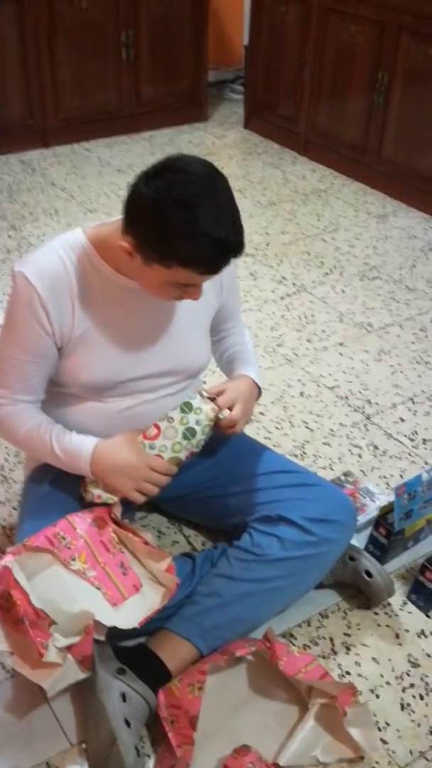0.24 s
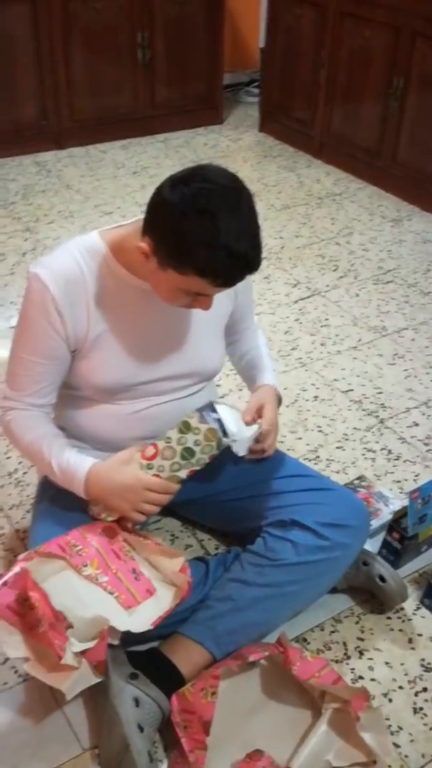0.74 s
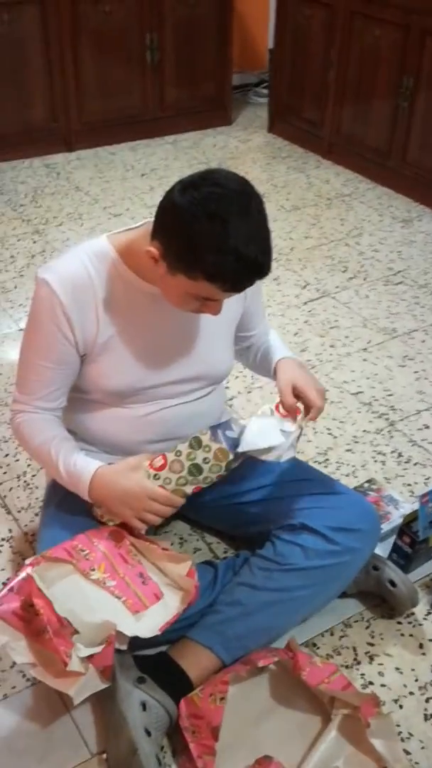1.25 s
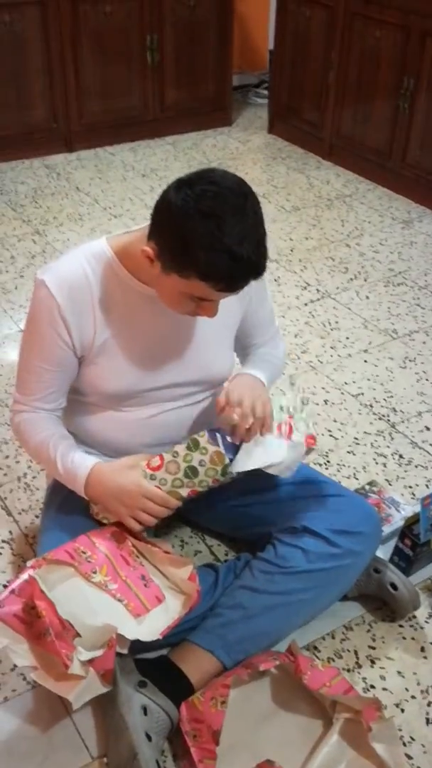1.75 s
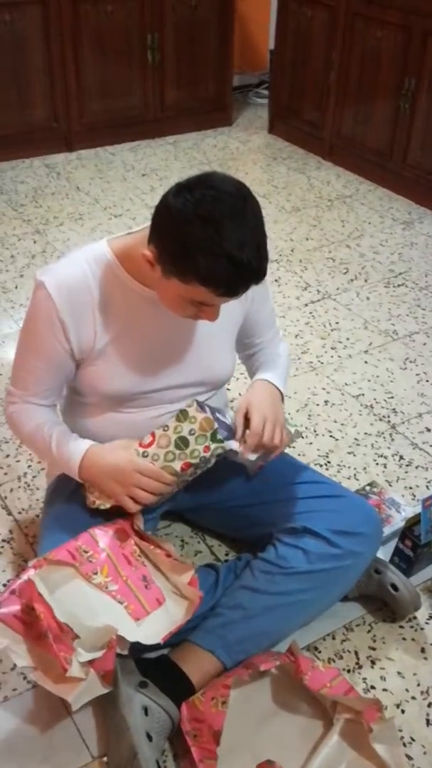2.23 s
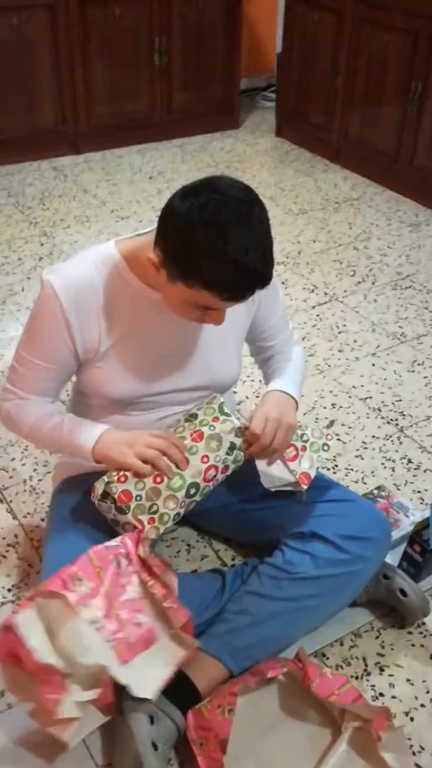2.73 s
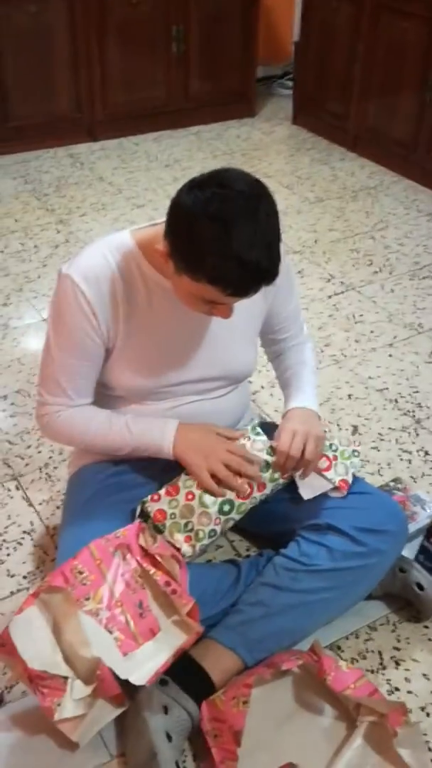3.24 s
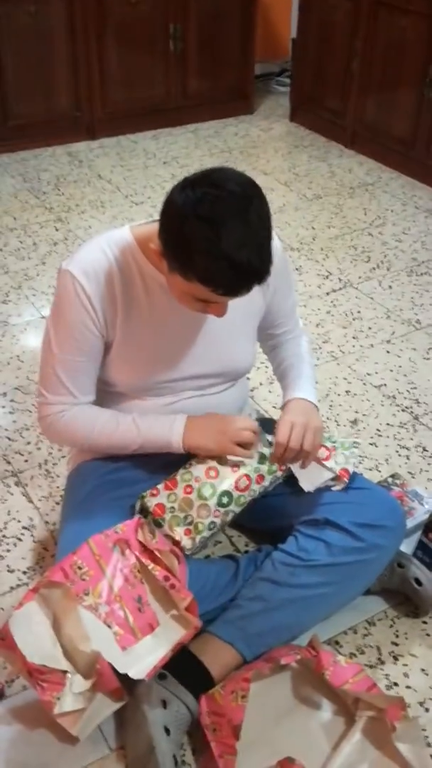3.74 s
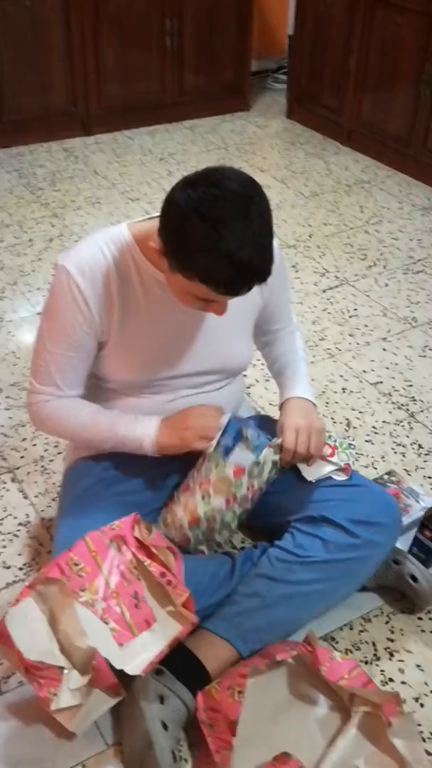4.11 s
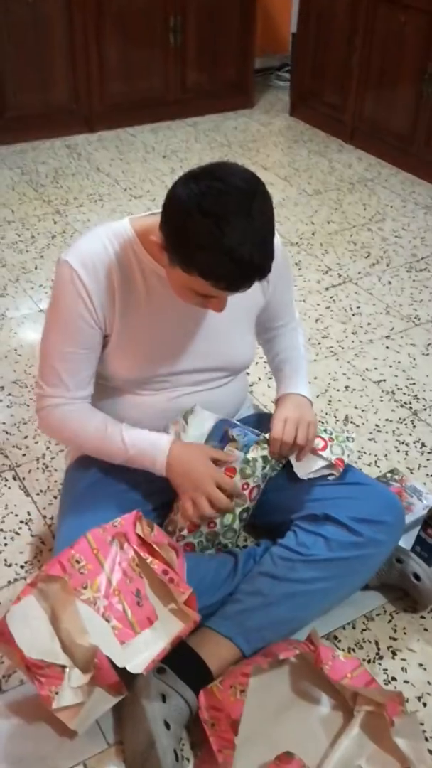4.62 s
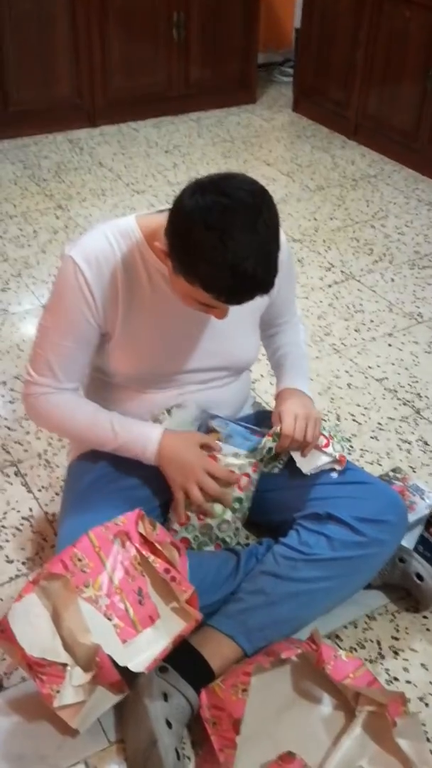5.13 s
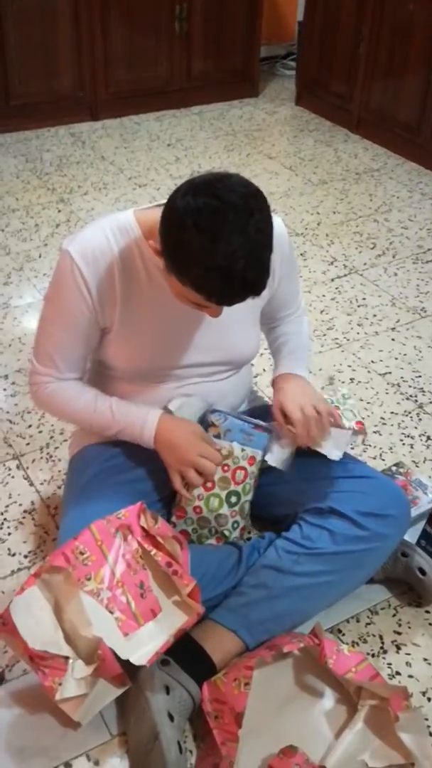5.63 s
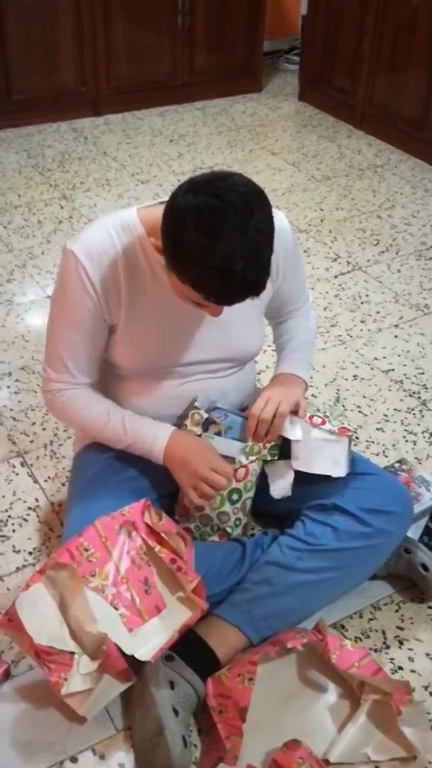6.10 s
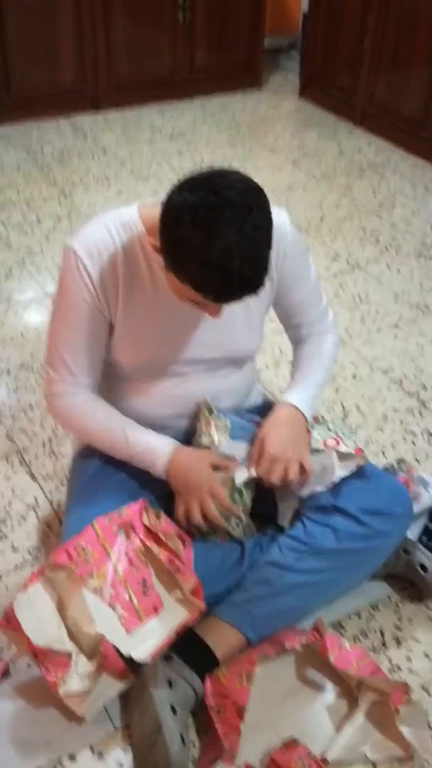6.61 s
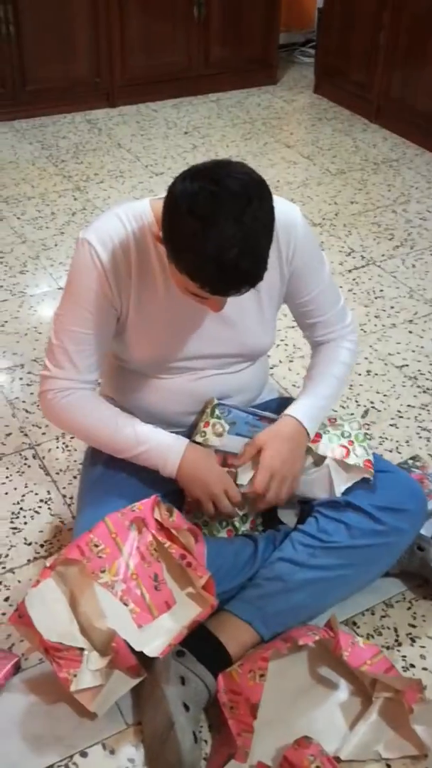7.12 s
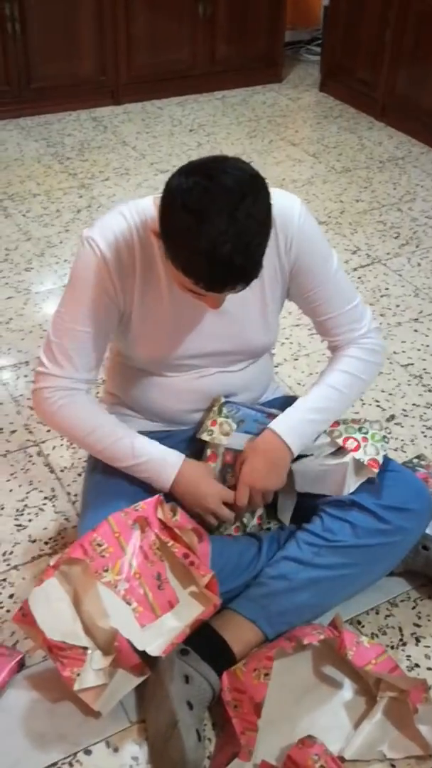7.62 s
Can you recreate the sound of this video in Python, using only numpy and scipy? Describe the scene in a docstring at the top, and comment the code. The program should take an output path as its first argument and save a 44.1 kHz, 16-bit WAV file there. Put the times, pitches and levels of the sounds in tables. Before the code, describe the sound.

Close in a hard tiled room, hands unwrap a small box. Crisp gift paper crackles and tears right away, with another firm rip about a second in, then lively crumpling. A softer fumbling pause follows, then two stronger rips, each with a dull hollow drone from the box. Lighter tears and small crackles finish it, over faint room air and hum.

```python
"""Gift paper is gripped, folded and ripped off a small box, strip by strip, in a hard tiled room.
Buckling creases and breaking fibres are streams of short ringing bursts, shaped by the force of the hands.
Single creases snap, slips scrape a stiff panel, and the pulled box drones in its low modes.
The room answers with decaying noise tails; still air and a faint mains hum lie underneath."""
import sys
import numpy as np
from scipy import signal
from scipy.fft import rfft, irfft, next_fast_len
from scipy.io import wavfile
from scipy.ndimage import uniform_filter1d, map_coordinates

SR = 44100
rng = np.random.default_rng(int(sys.argv[2]) if len(sys.argv) > 2 else 0)


def unload_audio(sound):
    """Save the sound as a 16-bit wav file, at the path given as the first command line argument."""
    columns = np.transpose(np.atleast_2d(sound))
    # keep every value between -1 and 1, then stretch to whole-number steps
    steps = np.round(np.clip(columns, -1, 1) * 32767)
    wavfile.write(sys.argv[1], SR, steps.astype(np.int16))


N = 346626  # samples

# Still air. Each row: frequency in Hz, relative level in dB per Hz.
AIR_SPECTRUM = [(20, 9.5), (60, -2.5), (150, 5), (300, -1), (700, 1.5), (2500, -1), (7000, -20.5),
                (16000, -42)]
# Mains hum. One row: frequency in Hz, RMS level in dB.
MAINS_HUM = (100, -81.5)
# Room decay. Each row: frequency in Hz, t60 in seconds.
ROOM_DECAY = [(200, 0.39), (600, 0.64), (1500, 0.45), (4000, 0.47), (9000, 0.32), (15000, 0.27)]
# Diffuse field. Each row: frequency in Hz, left-right correlation (-1 to 1).
FIELD_LIKENESS = [(100, 0.96), (290, 0.88), (640, -0.61), (1400, 0.33), (3000, 0.071), (14000, -0.2)]
# Channel colour. Each row: frequency in Hz, left minus right in dB.
CHANNEL_BALANCE = [(350, 0.3), (700, 0), (1250, -4), (2400, -1), (4600, -2.5), (7500, -4), (10000, 0.5),
                   (15000, 3)]
# Low modes of the box. Each row: frequency in Hz, width in Hz, relative level in dB.
BOX_MODES = [(143, 41, -16.5), (266, 61, -1), (327, 84, 0)]
# Paper and fingers slipping over the box. Each row: start in seconds, length in seconds, pitch in Hz,
# level in dB.
SCRAPES = [(0.788, 0.028, 2270, -45), (1.578, 0.049, 940, -63.5), (2.36, 0.12, 3800, -53),
           (2.795, 0.14, 1720, -59), (3.035, 0.1, 1510, -60.5), (3.285, 0.18, 2200, -57),
           (3.481, 0.13, 1560, -55), (3.639, 0.057, 1880, -39), (5.611, 0.053, 6200, -44),
           (5.839, 0.1, 4950, -45.5), (6.198, 0.28, 3270, -61.5), (6.619, 0.33, 3460, -56.5),
           (6.931, 0.47, 3400, -66.5), (7.227, 0.061, 3800, -46), (7.75, 0.031, 2130, -44.5),
           (7.834, 0.059, 2600, -47)]
# Loud creases that buckle. Each row: time in seconds, relative level in dB, pitch in Hz.
SNAPS = [(0.064, -41, 5770), (0.1393, -40, 5270), (0.2476, -32.5, 3380), (0.6136, -42.5, 6700),
         (0.8005, -37, 2200), (0.8805, -33, 8800), (1.1735, -37, 2500), (1.2028, -33, 6060),
         (1.2178, -29.5, 2900), (1.365, -38.5, 6200), (1.6778, -38, 2520), (1.8414, -39, 2800),
         (1.94, -36, 5900), (2.2178, -45.5, 3030), (2.2713, -38, 7340), (2.3773, -42, 4070),
         (2.4369, -31.5, 5760), (2.552, -35.5, 7100), (2.6299, -33.5, 5630), (2.723, -39.5, 7650),
         (2.795, -40.5, 1780), (2.9088, -42.5, 2580), (3.044, -48.5, 2100), (3.2196, -51, 1900),
         (3.2677, -42, 1830), (3.3012, -43.5, 2180), (3.338, -42, 2300), (3.3958, -53, 2200),
         (3.432, -50, 2270), (3.4836, -43, 1570), (3.5577, -45, 1600), (3.6122, -30, 6050),
         (3.6161, -30, 6600), (3.6595, -31.5, 5500), (3.7539, -34.5, 5170), (3.804, -28.5, 5960),
         (3.8074, -27.5, 5400), (3.9134, -32.5, 3650), (4.4599, -37.5, 8300), (4.5456, -36.5, 3300),
         (4.8242, -50, 6000), (4.851, -44, 6230), (4.8975, -35, 3600), (4.9238, -29, 5240),
         (5.3166, -41, 5100), (5.345, -46, 4300), (5.8459, -46, 5500), (6.521, -41.5, 7000),
         (6.7608, -39, 5640), (6.8078, -37, 6000), (7.0602, -51, 6100), (7.221, -39, 4100),
         (7.2439, -36.5, 6400), (7.3605, -38, 5900), (7.4548, -44.5, 5500), (7.694, -44.5, 2600),
         (7.739, -40, 2500), (7.752, -35, 2400), (7.771, -52, 2500), (7.8591, -34, 2900)]
# Colour of crackling paper. Each row: frequency in Hz, relative level in dB per Hz.
PAPER_SPECTRUM = [(76, -31), (130, -37), (211, -8), (248, -8.5), (297, -6.5), (472, -9), (565, -5),
                  (638, 0), (917, -3), (1460, -1.5), (4680, -2.5), (5620, 0), (9670, -10.5), (14200, -13),
                  (16000, -14)]
# Hands grip, fold or crumple the paper. Each row: start in seconds, length in seconds, relative paper
# level in dB, swell over the length in dB, brightness in dB per octave, relative box level in dB.
STROKES = [(0.0, 0.084, -41, -9, 3, -65), (.12, 0.14, -42, 6, 1.5, -65), (.25, 0.11, -39, -2, 1, -59),
           (.72, 0.15, -45.5, 3.5, -1.5, -76), (.89, .075, -42, 4, 1, -64),
           (1.215, 0.031, -35.5, -5.5, -1.2, -56.5), (1.28, 0.13, -45, 0, 0.5, -70),
           (1.585, 0.038, -58, 18, -1, -61.5), (1.68, 0.23, -45, -6.5, 1.2, -71),
           (1.94, 0.12, -42, -0.5, -0.9, -69), (2.1, .22, -49, 1, 0.5, -68),
           (2.43, 0.08, -43, -11.5, 1.4, -79), (2.55, 0.16, -40, -7.5, -.5, -69),
           (2.81, 0.11, -49, 2.5, -0.5, -77), (3.045, .15, -58.5, -3, -3.3, -73.5),
           (3.26, 0.13, -49.5, -9, -1, -77), (3.4, .2, -62, 0, -3, -80), (3.616, 0.088, -35, 2, 1.2, -77),
           (3.74, .06, -42.5, -1, 0, -64), (4.45, 0.06, -51, 10.5, -2, -62.5),
           (4.555, 0.059, -42, -1.5, -.3, -63), (4.753, 0.025, -68, -5, 3, -55),
           (4.853, 0.034, -43, 10, 2, -72), (4.9, .035, -35.5, -9, -0.5, -64),
           (5.34, 0.091, -45, -8, -2, -73), (5.62, 0.053, -43.5, 1.5, 2.5, -60.5),
           (5.86, 0.034, -46, 3, 5, -62), (6.11, 0.091, -46, -8, -1, -74),
           (6.23, 0.042, -42.5, -3, 2.5, -55.5), (6.3, 0.075, -49.5, 3.5, -1.5, -72),
           (6.45, 0.041, -54, 1, -2, -81), (6.525, 0.034, -47.5, -19.5, -0.9, -74),
           (6.632, 0.015, -37.5, 0, 1.1, -61), (6.67, 0.078, -46.5, 4, .3, -58.5),
           (6.76, 0.074, -44, -1, 0.4, -53), (6.89, 0.04, -50.5, -4, -0.5, -57),
           (7.06, 0.028, -56.5, -11, -3, -71), (7.195, .045, -52.5, -4, 2, -57.5),
           (7.44, 0.12, -51, 4, -1, -66.5), (7.56, .14, -47.5, 5, 1, -63), (7.75, 0.12, -45, 2, -1, -83)]
# Strips ripped off. Each row: start in seconds, length in seconds, relative paper level in dB,
# swell over the length in dB, brightness in dB per octave, relative box level in dB.
RIPS = [(.35, 0.088, -33, 1.5, 0.5, -58), (.97, .13, -34.5, 1.5, 0, -57), (3.807, 0.17, -33.5, 2.5, 1, -53),
        (4.95, .26, -35.5, -6.5, 0.5, -52), (5.91, 0.11, -38.5, 0.5, 2, -54.5),
        (7.243, 0.11, -40.5, -1, 2, -51)]

TOP_HZ = 15950
ATTACK_DB_PER_S = 748  # the paper takes up the load almost at once
STROKE_RELEASE_DB_PER_S, RIP_RELEASE_DB_PER_S = 225, 185  # a torn strip rustles a little longer
BOX_ATTACK_DB_PER_S, BOX_RELEASE_DB_PER_S = 498, 206  # the box takes up the pull more softly
RESTING_DB = -73.5  # paper merely held still creaks faintly
JERK_DB, JERKS_PER_S = 1.5, 35  # the hands move unevenly


def amp(db):
    """Amplitude of a level in dB."""
    return 10 ** (np.asarray(db) / 20)


def unit(x):
    """x scaled to an RMS of 1."""
    return x / np.sqrt(np.mean(x ** 2) + 1e-20)


def along(points, hz):
    """Interpolate (Hz, value) points on a log frequency axis."""
    f, v = np.transpose(points)
    return np.interp(np.log(hz + 1), np.log(f + 1), v)


def filtered(x, response):
    """Apply a complex response of frequency."""
    size = x.shape[-1]
    padded = next_fast_len(size + SR // 4)
    spectrum = rfft(x, padded) * response(np.fft.rfftfreq(padded, 1 / SR))
    return irfft(spectrum, padded)[..., :size]


def coloured(x, points):
    """Minimum-phase filter with the gain of (Hz, dB) points, so that clicks keep their edge."""
    size = 4096
    gain_db = np.maximum(along(points, np.fft.rfftfreq(size, 1 / SR)), -70)
    cepstrum = irfft(np.log(amp(gain_db)))
    cepstrum[1:size // 2] *= 2
    cepstrum[size // 2 + 1:] = 0
    impulse = irfft(np.exp(rfft(cepstrum)))
    return signal.fftconvolve(x, impulse[None], axes=1)[:, :N]


def resonance(f, hz, width_hz):
    """Band-pass response of one damped mode, 1 at its peak."""
    return 1j * f * width_hz / (hz * hz - f * f + 1j * f * width_hz)


def wobble(knots_per_s):
    """Smooth random curve: a spline through random knots."""
    knots = rng.standard_normal(int(N * knots_per_s / SR) + 4)
    return map_coordinates(knots, [np.arange(N) * knots_per_s / SR])


def diffuse(pair):
    """Mix two unrelated signals into a stereo field with the tabled left-right correlation."""
    def mid_side_gains(f):
        angle = np.arccos(np.clip(along(FIELD_LIKENESS, f), -1, 1)) / 2
        return np.array([np.cos(angle), np.sin(angle)])

    mid, side = filtered(pair, mid_side_gains)
    return np.array([mid + side, mid - side])


def background():
    """Still air as diffuse coloured noise, mains hum as a steady sine."""
    noise = diffuse(rng.standard_normal((2, N)))
    air = unit(filtered(noise, lambda f: amp(along(AIR_SPECTRUM, f))))
    hz, db = MAINS_HUM
    hum = amp(db) * np.sqrt(2) * np.sin(2 * np.pi * hz * np.arange(N) / SR)
    return amp(-69.5) * air + hum


def room(x, wet_db, folds=6):
    """Hard surfaces answer: every 5 ms the sound leaves a random fold, each with its own noise tail."""
    step = SR // 200
    fold = np.repeat(rng.integers(folds, size=N // step + 1), step)[:N]
    wet = np.zeros((2, N))
    for k in range(folds):
        hz, t, z = signal.stft(rng.standard_normal((2, 2 * SR // 3)), SR, nperseg=256)
        # floor and body are close: the first echoes are the strongest
        early = 1 + .8 * np.exp(-t / .008)
        decay = amp(-60 * t / along(ROOM_DECAY, hz)[:, None])
        tail = signal.istft(z * early * decay, SR, nperseg=256)[1]
        tail[:, :SR // 400] = 0
        tail /= np.sqrt(np.sum(tail ** 2) / 2)
        turn = np.sin(np.pi / 2 * uniform_filter1d(1. * (fold == k), step))
        wet += signal.fftconvolve(x * turn, tail, axes=1)[:, :N]
    return amp(wet_db) * diffuse(wet)


def box(pull):
    """Random slips of the dragged paper shake the hollow box in its low modes."""
    def modes(f):
        # neighbouring modes alternate in sign
        return sum((-1) ** k * amp(db) * resonance(f, hz, width_hz)
                   for k, (hz, width_hz, db) in enumerate(BOX_MODES))

    slips = rng.standard_normal(N) * (rng.random(N) < 700 / SR)  # about 700 per s
    drone = coloured(filtered(slips, modes)[None],
                     [(60, -31.5), (140, -2.5), (380, -1), (520, -3.0), (1500, -46.5)])
    return pull * unit(drone) * np.ones((2, 1))


def scrapes():
    """Tiny random slips excite one stiff panel of the wrapping."""
    out = np.zeros((2, N + SR))
    for start_s, length_s, hz, db in SCRAPES:
        size = int(length_s * SR)
        slips = rng.standard_normal(size) * (rng.random(size) < 500 / SR)  # about 500 per s
        panel = unit(filtered(slips, lambda f: resonance(f, hz, 0.31 * hz) ** 2))
        scrape = amp(db) * panel * signal.windows.tukey(size, .5)
        out[:, int(start_s * SR):][:, :size] += scrape
    return out[:, :N]


def pops(times_s, sizes, hz, life_s, ring, sharpness, spread):
    """Very short noise bursts, each ringing its own facet of paper, uneven between the channels."""
    size = 256
    t, f = np.arange(size) / SR, np.fft.rfftfreq(2 * size, 1 / SR)
    common, apart = rng.standard_normal((len(times_s), 2, size)).transpose(1, 0, 2)
    burst = np.array([common + spread * apart, common - spread * apart])
    burst *= np.sqrt(t) * np.exp(-t / life_s)
    facet = 1 + ring * resonance(f, hz[:, None], hz[:, None] / sharpness)
    waves = irfft(rfft(burst, 2 * size) * facet)
    waves *= sizes[:, None] / np.sqrt(np.mean(np.sum(waves ** 2, -1), 0))[:, None]
    at = (times_s * SR).astype(int)[:, None] + np.arange(2 * size)
    return np.array([np.bincount(at.ravel(), w.ravel(), N)[:N] for w in waves])


def snaps():
    """Single creases flip over within a millisecond or two; low-pitched facets ring the most."""
    times_s, db, hz = np.transpose(SNAPS)
    ring = np.clip(9000 / hz[:, None], 1, 5)
    x = pops(times_s, amp(db + 23.5), hz, life_s=.0007, ring=ring, sharpness=3.2, spread=.5)
    return coloured(x, [(150, -18), (700, -7), (1600, 3.5), (6500, 2.5), (10000, -4.5), (16000, -9.5)])


def envelope(t, start_s, length_s, swell_db, attack_db_per_s, release_db_per_s):
    """Gain of one movement: a rise up to its start, a hold that swells or sags, a release."""
    held = np.clip((t - start_s) / length_s, 0, 1)
    before = attack_db_per_s * np.maximum(start_s - t, 0)
    after = release_db_per_s * np.maximum(t - start_s - length_s, 0)
    return amp(np.maximum(swell_db * (held - .5) - before - after, -120))


def hands():
    """Movements add up to the paper force, its brightness, the share of ripping and the box pull."""
    t = np.arange(0, N, 64) / SR
    moves = np.transpose(list(STROKES) + list(RIPS))[:, :, None]
    start_s, length_s, db, swell_db, tilt, box_db = moves
    is_rip = (np.arange(len(start_s)) >= len(STROKES))[:, None]
    release = np.where(is_rip, RIP_RELEASE_DB_PER_S, STROKE_RELEASE_DB_PER_S)
    power = (amp(db) * envelope(t, start_s, length_s, swell_db, ATTACK_DB_PER_S, release)) ** 2
    pulls = amp(box_db) * envelope(t, start_s, length_s, 0, BOX_ATTACK_DB_PER_S, BOX_RELEASE_DB_PER_S)
    total = power.sum(0) + amp(RESTING_DB) ** 2
    force = np.sqrt(total)
    brightness = (power * tilt).sum(0) / total
    ripping = (power * is_rip).sum(0) / total
    pull = np.linalg.norm(pulls, axis=0)
    return [np.interp(np.arange(N) / SR, t, c) for c in (force, brightness, ripping, pull)]


def crackle(pops_per_s, scatter_db, centre_hz, life_s, ring):
    """Stream of random pops, mostly small and a few large, evened out to a nearly steady level."""
    when, strength, facet = rng.random((int(pops_per_s * N / SR), 3)).T
    sizes = amp(scatter_db * np.minimum(-np.log(1 - strength), 3.5))
    hz = np.minimum(centre_hz * 2 ** (3 * (facet - .5)), SR / 3)
    x = pops(when * N / SR, sizes, hz, life_s, ring, sharpness=2.8, spread=0.76)
    x = coloured(x, PAPER_SPECTRUM)
    power = uniform_filter1d(uniform_filter1d(np.mean(x ** 2, 0), SR // 30), SR // 30)
    return x / np.sqrt(np.abs(power) + 0.022 * np.mean(power))


def flexing(x, tilt_db_per_octave, patchy_db):
    """The taut sheet brightens, and its broad resonances wander as it bends."""
    hz, t, z = signal.stft(x, SR, nperseg=256)
    octaves = np.log2(np.clip(hz, 600, 8000) / 3300)
    slope = np.interp(t, np.arange(N) / SR, tilt_db_per_octave)
    patches = uniform_filter1d(rng.standard_normal(z.shape[1:]), size=5, axis=0)
    patches = uniform_filter1d(patches, size=20, axis=1)
    gain = amp(octaves[:, None] * slope + patchy_db * unit(patches))
    return signal.istft(z * gain, SR, nperseg=256)[1][:, :N]


def paper(force, tilt_db_per_octave, ripping):
    """Handling buckles creases one by one; a rip adds a dense run of breaking fibres."""
    share = np.clip(0.42 + .55 * ripping, 0, 1)
    creases = crackle(pops_per_s=240, scatter_db=6.0, centre_hz=3800, life_s=0.00071, ring=3.25)
    fibres = crackle(pops_per_s=1400, scatter_db=3.5, centre_hz=3120, life_s=0.00033, ring=1.78)
    # a tear shakes the whole sheet, which fills in the low middle
    sheet = filtered(fibres, lambda f: resonance(f, 310, 280))
    uneven_force = force * amp(JERK_DB * wobble(JERKS_PER_S) - 2.0)
    mix = np.sqrt(1 - share) * creases + np.sqrt(share) * fibres + .3 * ripping * sheet
    return flexing(uneven_force * mix, tilt_db_per_octave, patchy_db=1.7)


def scene():
    """Sum the near sources, the room's answer and the background."""
    force, tilt_db_per_octave, ripping, pull = hands()
    near = box(pull) + scrapes() + snaps() + paper(force, tilt_db_per_octave, ripping)
    return background() + room(near, wet_db=-3.5) + amp(-4.0) * near


def record(dry):
    """Colour the two channels differently and remove everything from TOP_HZ up."""
    def response(f):
        return amp(np.outer([.5, -.5], along(CHANNEL_BALANCE, f))) * (f < TOP_HZ)

    return filtered(dry, response)


dry = scene()
out = record(dry)
unload_audio(out)
```